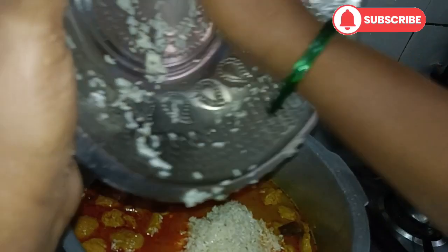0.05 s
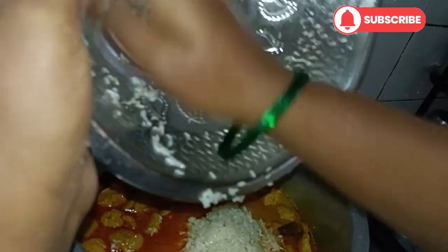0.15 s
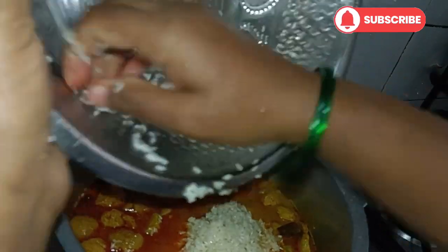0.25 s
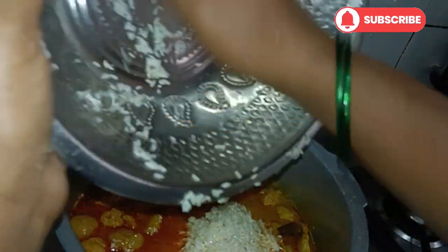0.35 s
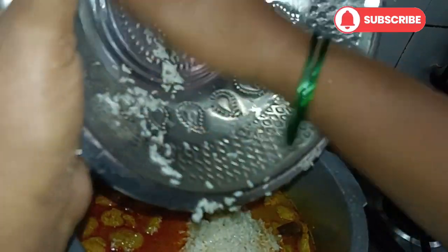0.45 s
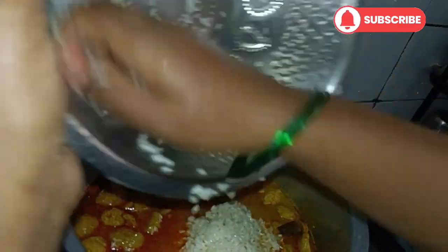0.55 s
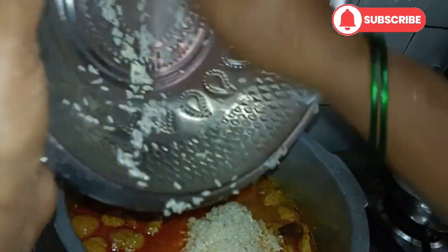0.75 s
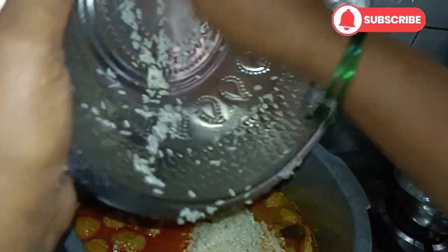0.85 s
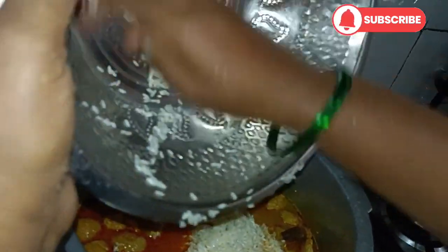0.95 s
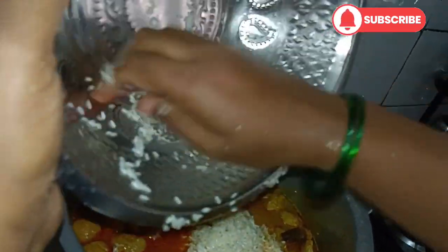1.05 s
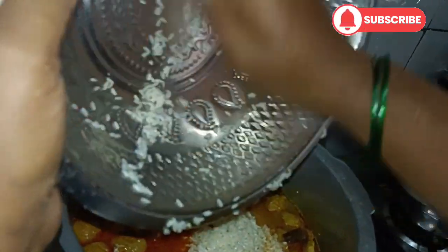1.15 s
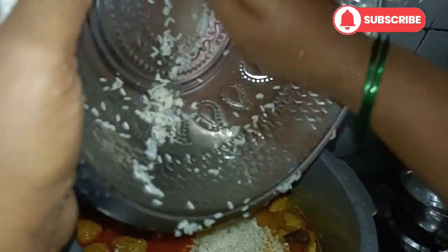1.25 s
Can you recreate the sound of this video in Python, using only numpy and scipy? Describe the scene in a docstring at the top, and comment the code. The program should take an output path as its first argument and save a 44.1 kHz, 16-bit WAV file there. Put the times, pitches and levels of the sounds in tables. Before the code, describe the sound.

A hand brushes raw rice off a ringing metal plate, glass bangles clinking faintly.

```python
"""Rice swept into a pot

A small tiled kitchen, a small microphone close to a tilted steel plate, the action a little to the right.
A hand sweeps raw rice off the plate: grains skitter and tick over the metal, fingers bump and drag on it,
and it rings when they let go. Glass bangles clink on the wrist; the rice patters low into a pot of curry."""
import sys
import numpy as np
from scipy import signal
from scipy.fft import rfft, irfft, next_fast_len
from scipy.io import wavfile

SR = 44100
rng = np.random.default_rng(int(sys.argv[2]) if len(sys.argv) > 2 else 0)


def persist_wave(psi):
    """Save psi, clipped to +-1, as 16-bit WAV."""
    counts = np.round(np.clip(psi, -1, 1) * 32767).astype(np.int16)
    wavfile.write(sys.argv[1], SR, np.atleast_2d(counts).T)


N = 57330

# Levels are relative within each table.
# flow of rice down the plate: time_s, level_db
SLIDE_LEVEL = [(0, -39), (.05, -46), (.075, -60), (.135, -58), (.165, -53.5), (.19, -87), (.22, -65),
               (.243, -46), (.275, -37), (.298, -43.5), (.34, -35), (.375, -35), (.405, -46.5), (.43, -48),
               (.505, -75), (.525, -82), (.534, -37), (.57, -55), (.62, -41), (.645, -37), (.675, -39.5),
               (.71, -28), (.755, -46), (.80, -34), (.865, -37), (.89, -28), (.95, -29.5), (1.0, -44.5),
               (1.037, -60), (1.05, -40.5), (1.085, -40), (1.11, -49.5), (1.204, -47), (1.216, -40.5),
               (1.3, -49.5)]
# spectrum of the sliding rice: frequency_hz, level_db
SLIDE_COLOUR = [(700, -31), (1280, -18.5), (1700, -27.5), (2250, -26), (2500, -12.5), (3000, -11.5),
                (3650, -1), (4150, -9), (4800, -1), (5500, -4.5), (6250, -9.5), (7300, -4), (9400, -11.5),
                (10800, -12), (12000, -22), (14500, -24.5), (15500, -26)]
# dense upper ring of the plate: frequency_hz, t60_s
SHIMMER_DECAY = [(300, 0.0068), (3000, 0.036), (7000, 0.044), (15000, 0.027)]
# skin rubbing on the plate: time_s, level_db
RUB_LEVEL = [(0, -48.5), (.06, -48.5), (.11, -69), (.22, -53.5), (.25, -40), (.33, -35.5), (.38, -50),
             (.48, -70.5), (.62, -81), (.64, -42), (.71, -43), (.76, -42.5), (.95, -45.5), (1.01, -68),
             (1.05, -69), (1.08, -35.5), (1.13, -61.5), (1.19, -47.5), (1.3, -62)]
# resonances of the rubbed plate: pitch_hz, width_hz, level_db
RUBBED_MODES = [(449, 47, -9.5), (598, 29, -10.5), (630.3, 17.5, 1.5), (803.4, 10.4, 1.5), (906, 13, -1),
                (1026, 15, -9.5), (1214, 27, -13.5)]
# the hand letting go of the plate: start_s, low_modes_db, high_modes_db
RELEASES = [(0, -44, -59), (.327, -25.5, -77), (.712, -39, -34)]
# modes of the free plate: pitch_hz, level_db, t60_s
FREE_MODES = [(464.3, -17.5, 0.33), (638, 0, 0.17), (818, -18.5, 0.57), (928, 0, 0.31), (1004, -11.5, 0.26),
              (1868, -2.5, 0.19), (2517, 3, 0.35), (4740, -1, 0.35), (5400, 5, 0.14), (7800, 6, 0.1)]
# spectrum of the kitchen air: frequency_hz, level_db
AIR_COLOUR = [(25, -2), (55, -19), (85, -11), (112, -9), (150, -13), (250, -12.5), (340, -8), (700, -16.5),
              (2000, -22), (15000, -39)]
# faint swells of the low room hum (first two rows), clumps landing in the pot (the rest):
# start_s, length_s, level_db, centre_hz
LOW_BURSTS = [(.01, 0.017, -60, 111.3), (0.159, 0.041, -62, 110), (0.228, 0.013, -52, 98),
              (0.32, 0.0083, -43.5, 125), (0.652, 0.14, -48, 294), (0.743, 0.066, -51, 113),
              (0.807, 0.082, -46, 203), (0.881, 0.06, -46.5, 259), (0.925, 0.018, -53.5, 120)]
# single grains striking the plate: start_s, level_db
TICKS = [(0.081, -35), (.111, -38.5), (0.12, -35.5), (.3525, -19.5), (0.4136, -20.5), (0.6231, -23.5),
         (0.637, -24.5), (0.7824, -19.5), (.8065, -20.5), (0.8075, -24), (.8448, -18.5), (0.882, -17.5),
         (0.8855, -40), (0.935, -18), (1.043, -31), (1.047, -20), (1.122, -30), (1.2111, -32)]
# spectrum of a grain strike: frequency_hz, level_db
TICK_COLOUR = [(1500, -28.5), (3000, -30), (3700, -14), (5300, 2.5), (6200, -9.5), (7300, 2), (8600, -4.5),
               (11000, -13.5), (15500, -30)]
# the hand bumping the plate: start_s, level_db, pitch_ratio, deepest_mode_boost_db
BUMPS = [(.156, -34, 1.016, -24), (.223, -33.5, 1.05, -26), (.236, -25.5, .99, -19), (.257, -34, .98, 10),
         (.284, -31, 0.86, -4), (.313, -27.5, .98, 6.5), (.680, -30.5, 1.02, -2), (.700, -37, 0.92, 14),
         (1.063, -24, 1.06, 4.5), (1.075, -28, 1.01, 5), (1.178, -45.5, 1.03, -5)]
# modes of the plate damped by the hand: pitch_hz, level_db, t60_s
HELD_MODES = [(460.8, -3.5, 0.078), (599, -8, 0.16), (631, 3.5, 0.11), (829.2, -1, 0.1), (909, -7, 0.068),
              (954, -9, 0.12), (1237, -17, 0.19), (1326, -20.5, 0.11), (1964, -17, 0.13)]
# fingers pressing rice across the metal: start_s, length_s, level_db
DRAGS = [(0.232, 0.05, -38.5), (0.301, 0.012, -27), (0.319, 0.036, -33), (0.635, 0.023, -36),
         (0.677, 0.0083, -17), (0.693, 0.021, -21), (0.71, 0.087, -37), (1.055, 0.024, -36),
         (1.17, 0.076, -55)]
# spectrum of the dragged rice: frequency_hz, level_db
DRAG_COLOUR = [(120, -35.5), (200, -23.5), (298, -14.5), (437, 2), (534, -26.5), (641, 8), (974, -11.5),
               (1300, -3.5), (1480, -19.5), (2210, -10), (2420, -10.5), (3070, -21.5), (3240, -11.5),
               (3750, -6.5), (4750, -9), (5390, -2), (6710, -14), (7760, -8), (15500, -46.5)]
# spectrum of a fingernail's crack on steel: frequency_hz, level_db
NAIL_COLOUR = [(300, -22), (1000, -14), (2800, -2), (4200, -11), (5600, 4), (7000, -15), (11000, -10),
               (15500, -45)]
# modes rung by the nail: pitch_hz, level_db, t60_s
NAIL_MODES = [(2900, -5, 0.013), (5400, -3, 0.022), (5980, -3.5, 0.014), (10630, -9, .008)]
# bangles knocking together: start_s, level_db, tilt_db_per_octave
CLINKS = [(0.529, -45, -2), (.539, -47, -23.5), (.574, -49, -15), (.606, -42.5, 0), (.6228, -41, 8),
          (.638, -38.5, -2), (.652, -37, 11), (.669, -51, 6), (0.8246, -33, 5), (.835, -43.5, 22),
          (.8448, -37.5, 12)]
# modes of the glass bangles: pitch_hz, level_db, t60_s
GLASS_MODES = [(3390, 2.5, 0.067), (3570, -6, 0.068), (4820, -0.5, 0.08), (4600, -0.5, 0.074),
               (6910, 4, 0.027), (7450, 4.5, 0.028), (7210, 5.5, 0.023), (6930, -8, 0.029),
               (8600, -21, 0.034)]
# reverberation of the tiled kitchen: frequency_hz, t60_s
KITCHEN_DECAY = [(150, 0.5), (1000, 0.21), (5000, 0.22), (14000, .15)]


def amp(db):
    """Decibels to gain."""
    return 10 ** (np.asarray(db) / 20)


def unit(x):
    """Scale to rms 1."""
    return x / np.sqrt(np.mean(x ** 2) + 1e-20)


def along(points, hz):
    """Interpolate (frequency_hz, value) points on a log frequency axis."""
    f, v = np.transpose(points)
    return np.interp(np.log(hz + 1), np.log(f + 1), v)


def clock():
    """Time of each sample in seconds."""
    return np.arange(N) / SR


def level(rows):
    """Gain per sample from (time_s, level_db) rows."""
    return amp(np.interp(clock(), *np.transpose(rows)))


def stroke(start, length, attack, t60):
    """Envelope of attack, hold and release, all in seconds."""
    t = clock() - start
    return np.clip(t / attack, 0, 1) * amp(-60 * np.maximum(t - length, 0) / t60)


def filtered(x, response):
    """Multiply the spectrum of x by response(hz)."""
    size = 2 * next_fast_len(N)
    return irfft(rfft(x, size) * response(np.fft.rfftfreq(size, 1 / SR)), size)[..., :N]


def coloured(x, points):
    """Minimum-phase filter of power gain 1 with the given spectrum."""
    def response(hz):
        cepstrum = irfft(np.log(unit(amp(along(points, hz)))))
        half = len(cepstrum) // 2
        cepstrum[1:half] *= 2
        cepstrum[half + 1:] = 0
        return np.exp(rfft(cepstrum))
    return filtered(x, response)


def pan(x, left_db):
    """Set the left channel's level against the right; negative leans right."""
    return x * amp(np.array([[left_db], [-left_db]]) / 2)


def tail(x, decay):
    """Pass x through a diffuse decay of energy about 1, different in each channel."""
    hz, t, noise = signal.stft(rng.standard_normal((2, SR // 2)), SR, nperseg=128)
    t60 = along(decay, hz)[:, None]
    impulse = signal.istft(noise * amp(-60 * t / t60) / np.sqrt(t60), SR, nperseg=128)[1]
    return signal.fftconvolve(np.atleast_2d(x), impulse / np.linalg.norm(impulse[0]), axes=1)[:, :N]


def grains(per_s, spread_db):
    """Random tiny impacts of uneven size, rms 1."""
    size = amp(spread_db * np.clip(rng.standard_normal(N), -2, 2)) * rng.choice([-1, 1], N)
    return unit(size * (rng.random(N) < per_s / SR))


def snap(start, t60):
    """A very short burst of contact noise, its energy proportional to its decay time."""
    burst = stroke(start, length=0, attack=.0001, t60=t60) * rng.standard_normal(N)
    return unit(burst) * np.sqrt(t60 * SR / N / np.log(1000))


def low_burst(start, length, db, centre_hz, octaves=.5):
    """A soft burst of grainy noise in one low band."""
    noise = grains(per_s=500, spread_db=1) + 0.93 * rng.standard_normal((2, N))
    band = filtered(noise, lambda hz: np.exp(-.5 * (np.log2((hz + 1) / centre_hz) / octaves) ** 2))
    return amp(db) * unit(band) * stroke(start, length, attack=0.0046, t60=.16)


def mode(start, hz, t60, attack, spread_rad):
    """One decaying mode, with a random phase in each channel."""
    t = np.maximum(clock() - start, 0)
    phase = spread_rad * rng.standard_normal((2, 1))
    return np.sin(2 * np.pi * hz * t + phase) * amp(-60 * t / t60) * (1 - np.exp(-t / attack))


def metal(x, colour, ring_db, lag_s=0.00022):
    """Contacts heard directly, later on the left, and through the plate's dense upper ring."""
    direct = filtered(x, lambda hz: np.exp(1j * np.pi * hz * lag_s * np.array([[-1], [1]])))
    ring = amp(ring_db) * tail(x, SHIMMER_DECAY)
    return coloured(direct + ring, colour) / np.hypot(1, amp(ring_db))


def radiated(x, cut_hz=373):
    """The thin plate radiates almost nothing below its deepest mode."""
    return signal.sosfilt(signal.butter(7, cut_hz, 'high', fs=SR, output='sos'), x)


def sliding_rice():
    """Many grains skitter down the embossed metal."""
    contacts = grains(per_s=1500, spread_db=4.5) * level(SLIDE_LEVEL)
    return pan(amp(1.0) * metal(contacts, SLIDE_COLOUR, ring_db=20), left_db=-4.5)


def rubbing_skin():
    """Skin friction stirs the low resonances of the plate."""
    def body(hz):
        return sum(amp(db) * 1j * hz * width / (pitch ** 2 - hz ** 2 + 1j * hz * width)
                   for pitch, width, db in RUBBED_MODES)
    slips = grains(per_s=1500, spread_db=2) + 0.74 * rng.standard_normal((2, N))
    return unit(radiated(filtered(slips, body))) * level(RUB_LEVEL)


def free_ring(split_hz=1400):
    """The plate rings on once the hand has left it."""
    return sum(amp(mode_db + (low_db if hz < split_hz else high_db))
               * mode(start, hz, t60, attack=0.001, spread_rad=0.87)
               for start, low_db, high_db in RELEASES for hz, mode_db, t60 in FREE_MODES)


def room_tone(air_db=-63.5, hum_hz=112.8, hum_db=-69):
    """Quiet kitchen air with a low hum."""
    noise = rng.standard_normal(N) + 1.05 * rng.standard_normal((2, N))
    air = amp(air_db) * unit(coloured(noise, AIR_COLOUR))
    hum = amp(hum_db) * np.sin(2 * np.pi * hum_hz * clock())
    return pan(air + hum, left_db=-3.5)


def hum_swells():
    """The low room hum swells faintly, twice."""
    return pan(sum(low_burst(*row) for row in LOW_BURSTS[:2]), left_db=-7.5)


def grain_ticks():
    """Single grains hit the steel hard."""
    hits = sum(amp(db) * snap(start, t60=0.0049) for start, db in TICKS)
    return pan(amp(-0.5) * metal(hits, TICK_COLOUR, ring_db=10), left_db=-6)


def hand_bumps():
    """Soft blows of the hand give a short hollow note; flatter blows flex the deepest mode more."""
    notes = 0
    for start, db, pitch_ratio, deep_db in BUMPS:
        for k, (hz, mode_db, t60) in enumerate(HELD_MODES):
            gain = amp(db + mode_db + deep_db * (k == 0) + rng.normal(0, 1))
            notes += gain * mode(start, hz * pitch_ratio, t60, attack=0.0034, spread_rad=hz / 1500)
    return radiated(notes)


def landing_rice():
    """Clumps drop on the soft heap in the pot with a dull patter."""
    return pan(sum(low_burst(*row) for row in LOW_BURSTS[2:]), left_db=-7.5)


def dragged_rice():
    """Rice trapped under the fingers rasps across the plate."""
    force = sum(amp(db) * stroke(start, length, attack=0.0018, t60=0.04) for start, length, db in DRAGS)
    rasp = force * grains(per_s=5000, spread_db=0.5)
    return pan(metal(rasp, DRAG_COLOUR, ring_db=7.5), left_db=-4)


def nail_tap(start_s=.3036, gain_db=-18):
    """A fingernail taps the far side of the plate: a crack and a very short ring."""
    crack = metal(snap(start_s, t60=0.01), NAIL_COLOUR, ring_db=2)
    ring = sum(amp(db) * mode(start_s, hz, t60, attack=0.00026, spread_rad=0.84)
               for hz, db, t60 in NAIL_MODES)
    return pan(amp(gain_db) * (crack + ring), left_db=-7)


def bangles(detune=.005, jangle_db=-4):
    """Thin glass rings clink and jangle against each other; harder knocks tend to be brighter."""
    rings = 0
    for start, db, tilt in CLINKS:
        for hz, mode_db, t60 in GLASS_MODES:
            gain = amp(db + mode_db + tilt * np.log2(hz / 5000) + rng.normal(0, 1.1))
            pitch_hz = hz * (1 + detune * rng.standard_normal())
            rings += gain * mode(start, pitch_hz, t60, attack=0.000067, spread_rad=1.55)
    jangle = amp(jangle_db) * tail(rings, SHIMMER_DECAY)
    return pan((rings + jangle) / np.hypot(1, amp(jangle_db)), left_db=-5.5)


def scene(reverb_db=-12):
    """Plate and pot close to the microphone, with a little answer from the tiles."""
    plate = pan(hand_bumps() + rubbing_skin() + free_ring(), left_db=-2)
    contacts = sliding_rice() + grain_ticks() + nail_tap() + bangles() + dragged_rice()
    direct = plate + contacts + hum_swells() + landing_rice()
    return direct + amp(reverb_db) * tail(direct, KITCHEN_DECAY) + room_tone()


def record(dry, low_cut_hz=68, top_hz=15600):
    """The small microphone loses deep bass and keeps nothing above its band limit."""
    thin = signal.sosfilt(signal.butter(2, low_cut_hz, 'high', fs=SR, output='sos'), dry)
    return filtered(thin, lambda hz: hz < top_hz)


dry = scene()
out = record(dry)
persist_wave(out)
```